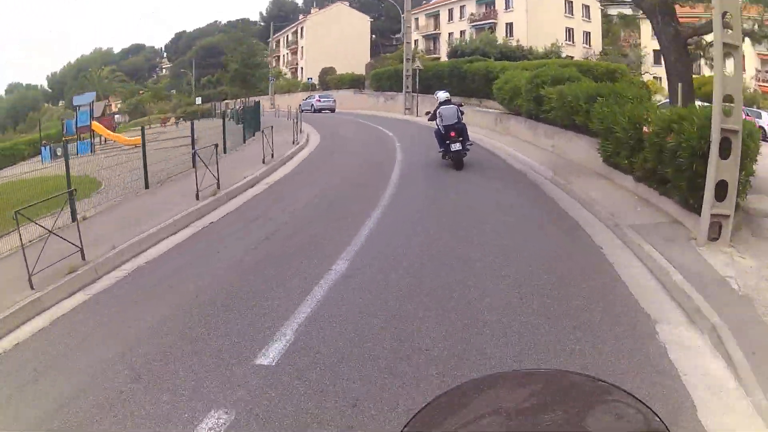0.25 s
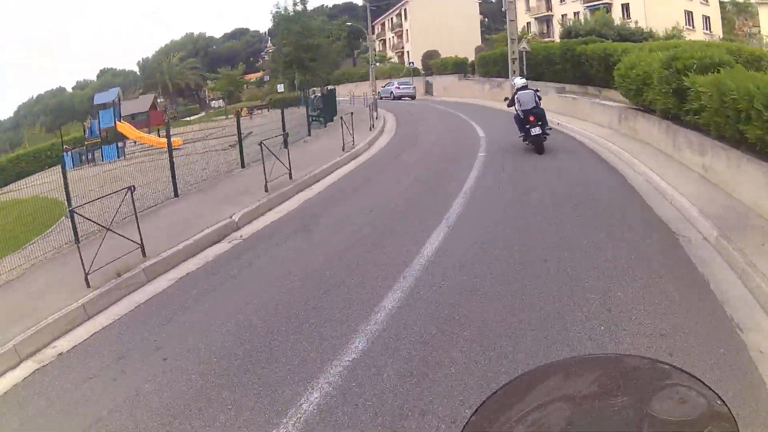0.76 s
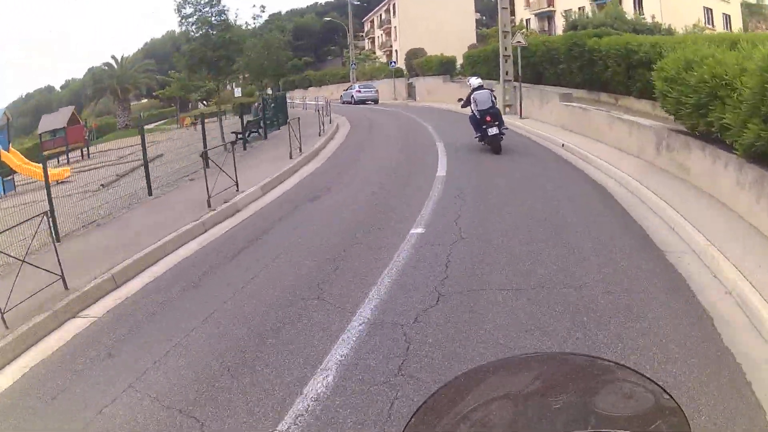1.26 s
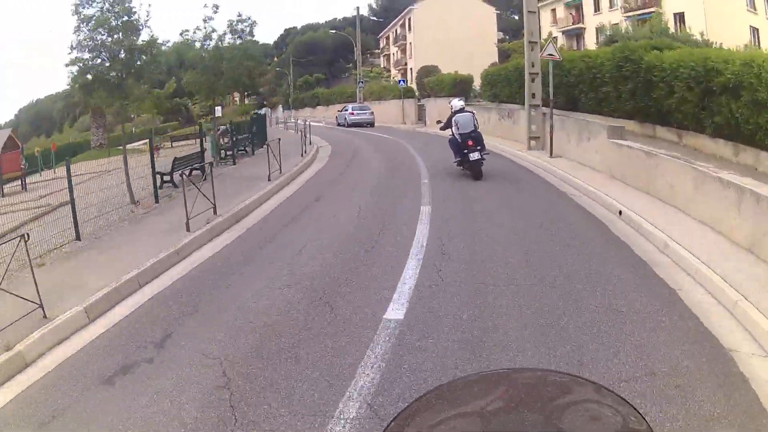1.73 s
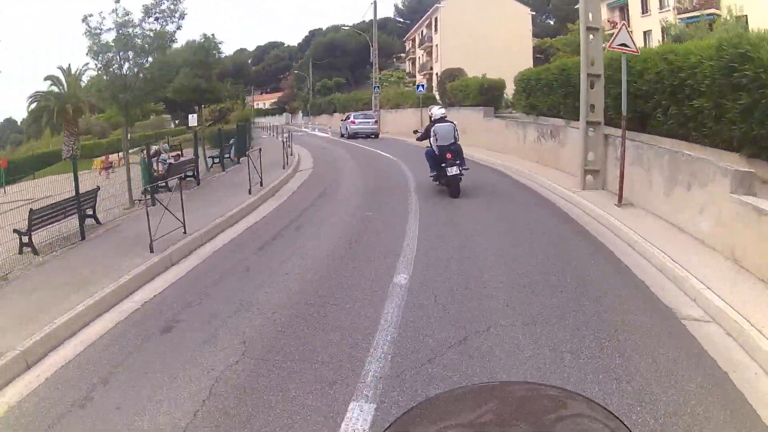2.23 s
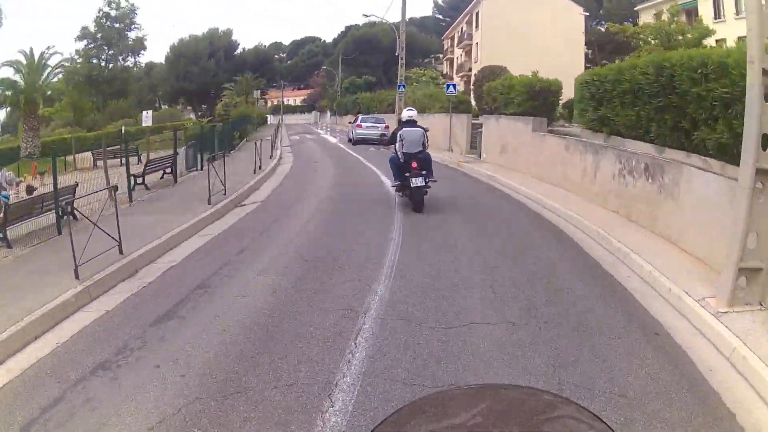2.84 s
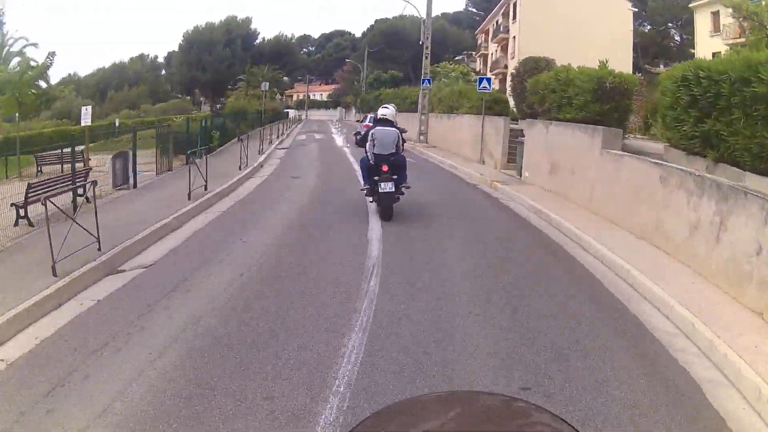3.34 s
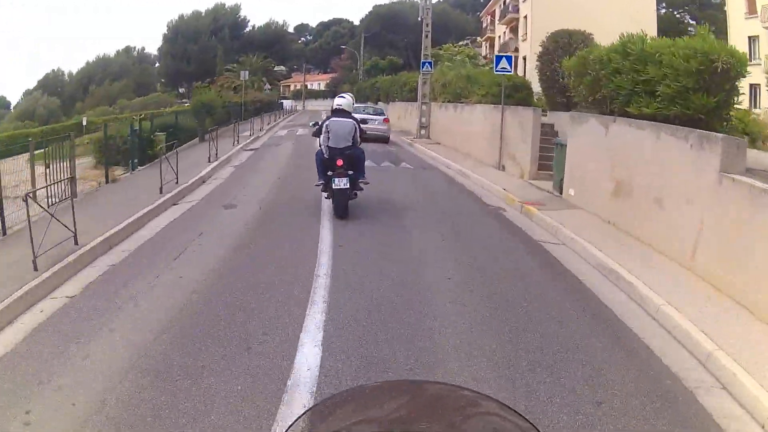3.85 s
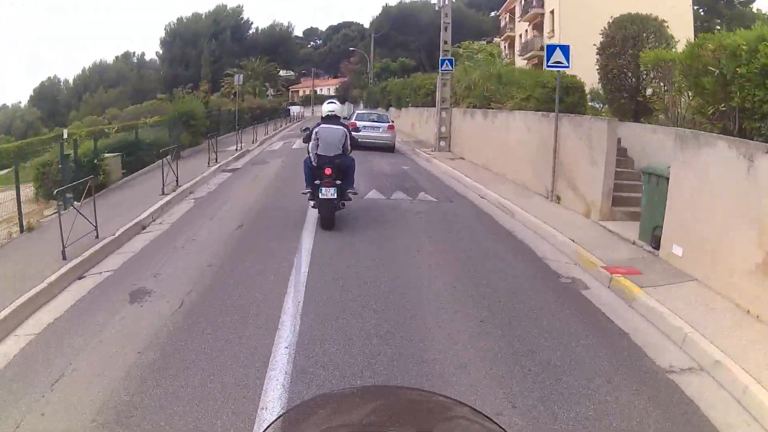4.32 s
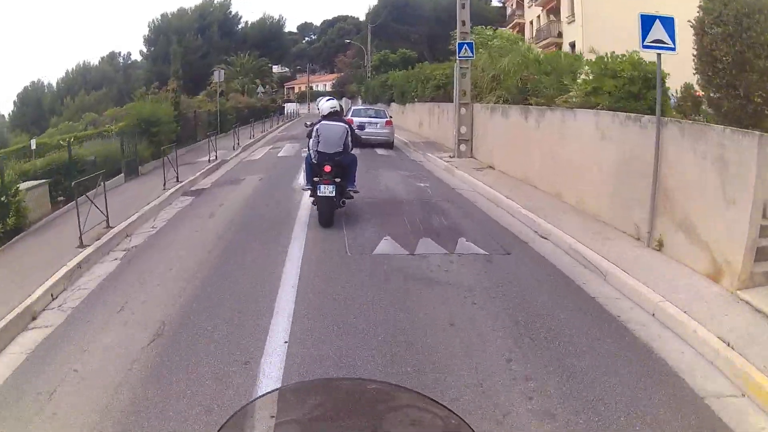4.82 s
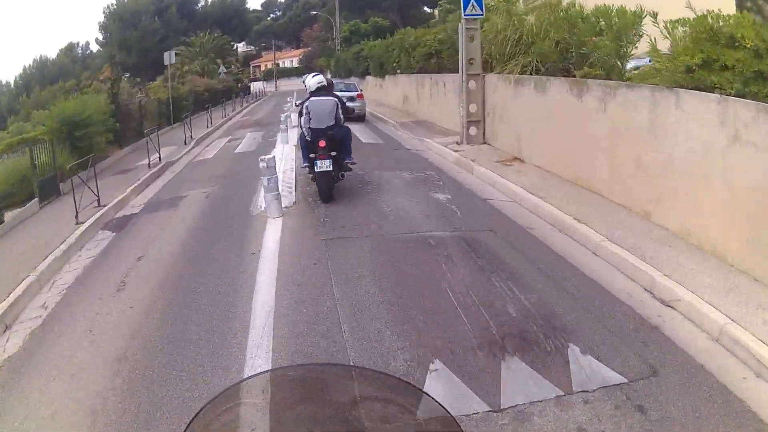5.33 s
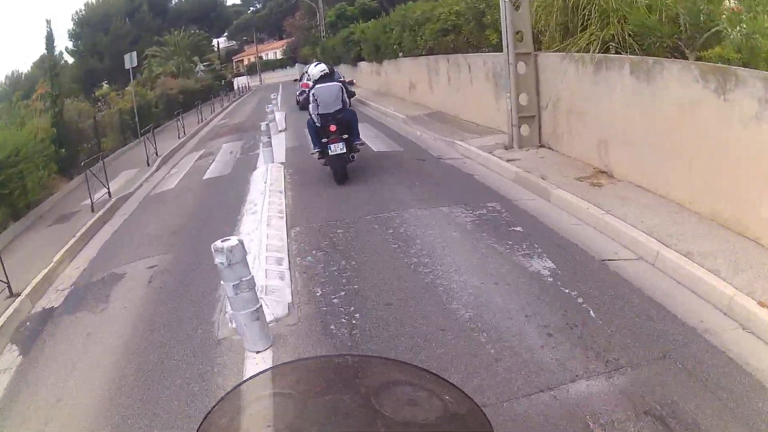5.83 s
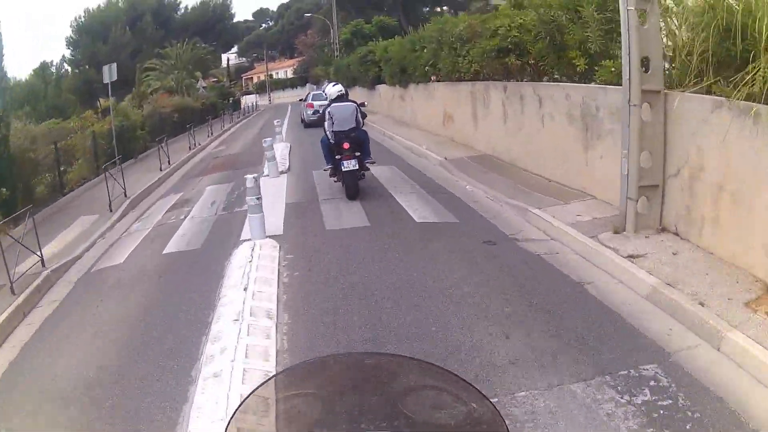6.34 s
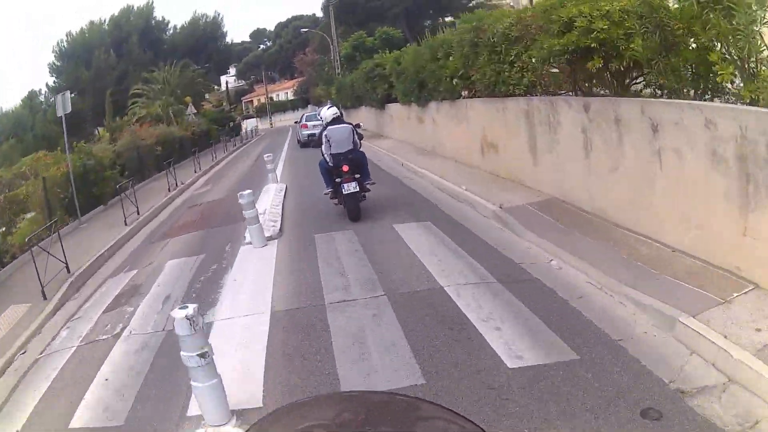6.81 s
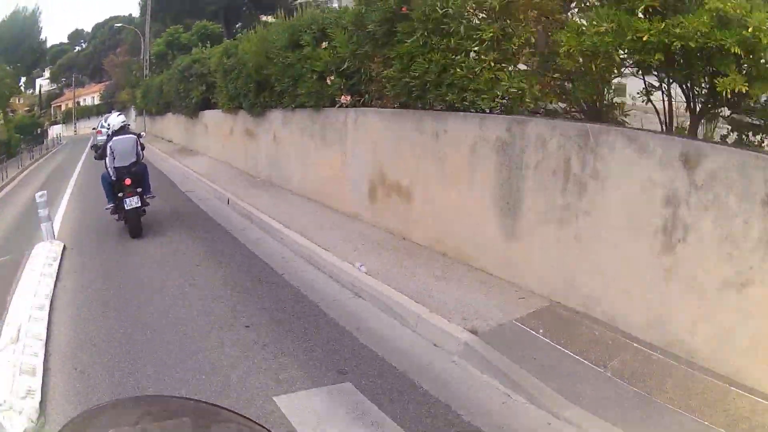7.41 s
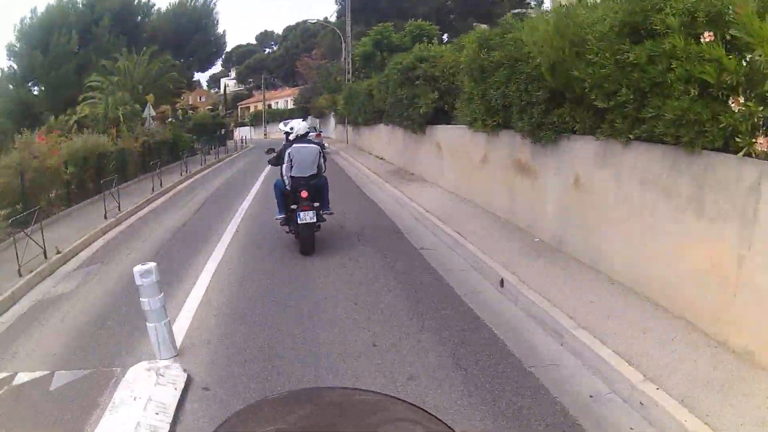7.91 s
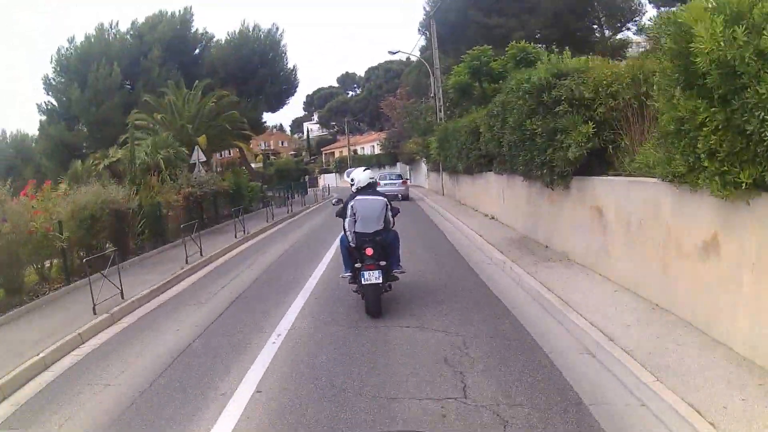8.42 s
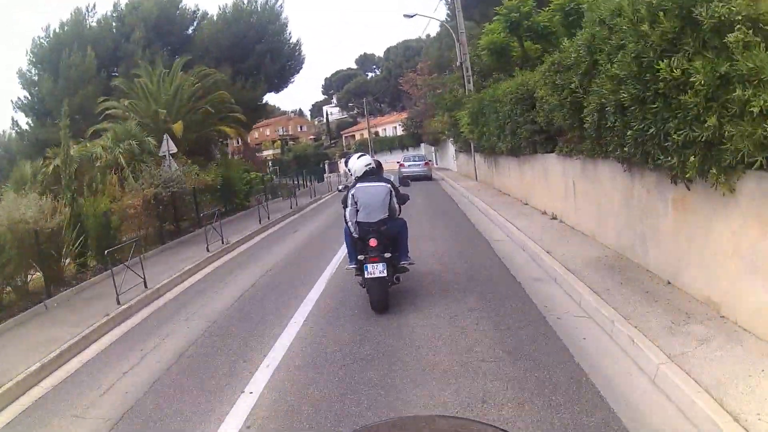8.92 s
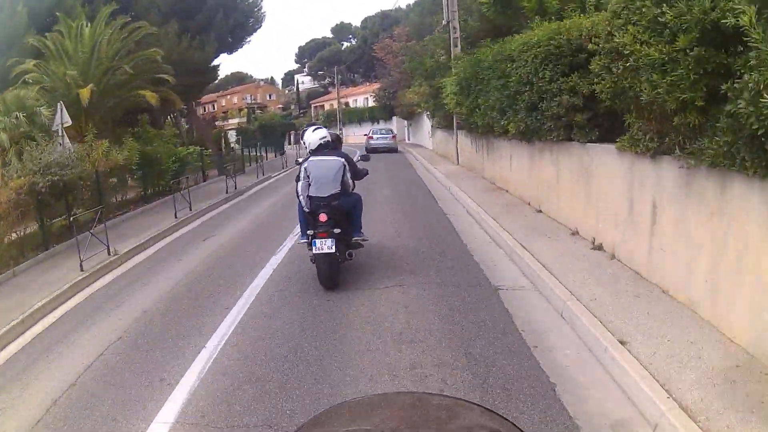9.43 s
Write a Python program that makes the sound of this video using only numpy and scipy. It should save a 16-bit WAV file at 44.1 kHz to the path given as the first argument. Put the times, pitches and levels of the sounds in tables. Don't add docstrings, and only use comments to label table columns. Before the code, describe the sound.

Heard from a small camera on a motorcyclist's helmet: a gritty engine pull rises briefly, then the throttle shuts and the bike coasts, leaving wind roar and heavy low buffeting. A second, deeper pull builds with rattling exhaust and valve clatter, then fades into the wind. A thin, high electronic whine and hiss persist throughout.

```python
import sys
import numpy as np
from scipy import signal
from scipy.fft import rfft, irfft, next_fast_len
from scipy.io import wavfile
from scipy.ndimage import uniform_filter1d, map_coordinates

SR = 44100
rng = np.random.default_rng(int(sys.argv[2]) if len(sys.argv) > 2 else 0)


def output_pcm(signal):
    pcm = np.clip(np.atleast_2d(signal).T, -1, 1) * 32767
    wavfile.write(sys.argv[1], SR, np.round(pcm).astype(np.int16))


def amplitude_ratio(level_db):
    exponent = np.asarray(level_db, float) / 20
    return 10 ** exponent


N = 426006

# time in seconds, exhaust level in dB.
LOAD = [(0, -37), (.4, -35.5), (.8, -34.5), (1.5, -35), (1.72, -38), (1.85, -46), (2.1, -65), (5.5, -65),
        (5.8, -48), (6.2, -41.5), (6.5, -40), (7.2, -39.5), (7.7, -38), (8.25, -38.5), (8.55, -43),
        (8.8, -52), (9.66, -56)]
# time in seconds, wind strength in dB.
AIRFLOW = [(0, -33.5), (.5, -32), (.8, -29.5), (1.5, -27), (1.9, -29), (2.5, -29.5), (2.75, -26.5),
           (3.2, -30.5), (3.75, -33), (4, -36), (4.6, -34.5), (5, -35.5), (5.7, -36.5), (7.2, -36),
           (7.9, -33.5), (8.45, -34), (9.3, -31.5), (9.66, -33.5)]
# centre in Hz, width in Hz, boost in dB.
HOUSING_MODES = [(1017, 127, 17), (1301.5, 91, 12.5), (1846, 444, 6.5), (2944, 140, 4.5), (4216, 452, 20),
                 (6230, 460, 10.5), (4255, 72, 4.5), (4720, 430, -3)]
# start in seconds, length in seconds, top in dB, swing in Hz.
SWINGS = [(0, 0.29, -26, 42.1), (0.285, 0.17, -25.5, 41.5), (0.474, 0.25, -16.5, 41.4),
          (.73, .27, -23, 40.7), (0.975, 0.44, -17.5, 40.7), (1.395, 0.51, -14, 40),
          (1.854, 0.23, -14, 41.8), (2.07, 0.14, -21, 44), (2.228, 0.33, -16, 43.48),
          (2.445, 0.67, -18, 43.05), (2.995, 0.43, -20.5, 41), (3.48, 0.27, -22.5, 41),
          (3.752, 0.25, -23, 41.2), (4.055, 0.18, -29, 43.2), (4.222, 0.33, -23.5, 40.6),
          (4.571, 0.82, -32, 40.63), (4.997, 0.49, -33, 45.16), (5.489, 0.42, -31, 40.9),
          (5.871, 0.24, -29.5, 41.2), (6.158, 0.33, -29.5, 41), (6.619, 0.26, -32, 39.7),
          (6.858, 0.25, -29, 42.6), (7.346, 0.27, -24.5, 42.4), (7.702, .24, -25.5, 42.16),
          (8.085, 0.36, -33.5, 40), (8.48, 0.27, -27, 41), (8.693, 0.23, -19.5, 39.6),
          (8.873, 0.27, -18.5, 39.2), (9.15, 0.14, -22, 40.3), (9.407, 0.24, -23.5, 38.43)]
REST_DB = -44


def engine():
    # time in seconds, engine cycles per second in Hz.
    pull_1 = [
        (0, 36),
        (.45, 36.98),
        (.85, 38.07),
        (1.25, 38.99),
        (1.45, 39.11),
        (1.85, 39.1),
    ]
    # time in seconds, engine cycles per second in Hz.
    coast = [
        (1.95, 37.5),
        (2.05, 38.47),
        (2.789, 37.16),
        (3.86, 29.0),
        (4.1, 25.52),
        (5.4, 23.62),
    ]
    # time in seconds, engine cycles per second in Hz.
    pull_2 = [
        (5.4, 24.3),
        (6.25, 23.92),
        (6.45, 24.22),
        (7.25, 26.85),
        (7.65, 28.1),
        (8.25, 29.66),
        (8.45, 29.94),
        (9.66, 30.2),
    ]
    front_fires = .0779, 6.1164
    # delay in cycles, level in dB.
    rear_cylinder = [
        (.56, -20),
        (.365, -2),
    ]
    edges_hz = 1150, 720
    pull_orders = [
        (-15, -32, -16, -20, -25),
        (-30, -25, -15, -13, -17),
    ]
    coast_orders = [
        (-55, -52, -61, -65, -68),
        (-64, -59, -59, -60, -68),
    ]
    load_db = curves(LOAD)[0]
    pressure, blows, cycle = np.zeros((3, N))
    orders = np.zeros((5, N))
    spells = zip([[*pull_1, *coast], pull_2], front_fires, rear_cylinder, edges_hz, pull_orders, coast_orders)
    for speed, fires, rear, edge_hz, pulled, coasting in spells:
        turns, on = crank(speed, fires)
        spell = on * firings(turns, rear, scatter_db=1.8)
        pressure += exhaust_blow(spell, edge_hz) * np.sqrt(np.mean(on))
        blows += on * firings(turns, (rear[0], -11), scatter_db=1.6)
        cycle += on * turns
        pulled_db = np.add.outer(pulled, load_db)
        orders += on * np.maximum(amplitude_ratio(coasting)[:, None], amplitude_ratio(pulled_db))
    return exhaust(pressure, load_db) + valves(blows, load_db) + drone(cycle, orders) + intake(load_db)


def exhaust_blow(spell, edge_hz):
    def shape(f):
        advance = np.exp(2j * np.pi * f * .0004)
        return 1j * f / (1 - 1j * f / 330) / (1 + 1j * f / edge_hz) ** 3 * advance
    return unit(filtered(spell, shape))


def exhaust(pressure, load_db):
    # delay in seconds, level in dB.
    echoes = [
        (.0023, -4.5),
        (.0047, -8.5),
    ]
    # centre in Hz, width in Hz, boost in dB.
    pipe = [(298.5, 17, 15), (476, 30, 4), (587, 30, 13), (670, 98, -4.5), (856, 130, 7)]
    pipe_tone = boosted(pipe)

    def path(f):
        bounces = sum(amplitude_ratio(db) * np.exp(-2j * np.pi * f * s) for s, db in echoes)
        return (1 + bounces) * pipe_tone(f)
    return amplitude_ratio(load_db) * unit(filtered(pressure, path))


def valves(blows, load_db):
    puffs = filtered(blows, lambda f: np.exp(2j * np.pi * f * .0015) / (1 + 1j * f / 150) ** 2)
    spectrum = [(1500, -20), (3000, -7.5), (4200, -6.0), (5000, -27), (7300, -13), (9000, -40), (14000, -120)]
    clatter = puffs * rush(spectrum, HOUSING_MODES, patchy_db=-1.8)
    ping_s, ping_half_s, ping_db = 6.55, .35, 5.5
    ping = np.clip(1 - abs(np.arange(N) / SR - ping_s) / ping_half_s, 0, 1)
    level_db = together(load_db - 14.5, -66.5) + ping_db * ping
    return amplitude_ratio(level_db) * unit(clatter)


def drone(cycle, orders):
    # centre in Hz, width in Hz, boost in dB.
    bike_frame = [(77, 14, 6), (119, 26, 10)]
    tones = np.zeros(N)
    for order, size in enumerate(orders, 2):
        tones += size * amplitude_ratio(1.16 * wobble(4)) * np.sin(2 * np.pi * order * cycle)
    return np.sqrt(2) * filtered(tones, boosted(bike_frame))


def intake(load_db):
    breath = filtered(rng.standard_normal(N), lambda f: ring(f, hz=1762, width=415) ** 2)
    return amplitude_ratio(together(load_db - 5.5, -47)) * unit(breath)


def crank(pull, fires):
    turns = np.cumsum(curves(pull)[0]) / SR
    t = np.arange(N) / SR
    return turns - turns[round(fires * SR)], (t >= pull[0][0]) * (t < pull[-1][0])


def firings(turns, rear, scatter_db):
    blows = np.zeros(N)
    for delay, db in [(0, 0), rear]:
        at = np.flatnonzero(np.diff(np.floor(turns - delay)))
        scatter = rng.standard_normal(N // 500)[:len(at)]
        blows[at] = amplitude_ratio(db + scatter_db * scatter)
    return blows


def shake():
    # time in seconds, lower mode in dB, upper mode in dB.
    knocks = [(.5, -40, -31), (.57, -27, -42), (.96, -42, -39), (1.05, -31, -41), (1.24, -41, -37),
              (1.4, -35, -43), (1.48, -39, -33.5), (2.15, -30, -29), (2.26, -32, -42), (2.39, -50, -27),
              (2.53, -29.5, -43), (2.66, -40, -29.5), (2.77, -30, -29), (3.06, -42, -32.5),
              (3.23, -31, -29), (3.79, -31.5, -40), (4.39, -36, -51), (6.38, -42, -46), (6.94, -52, -37.5),
              (9.58, -37, -47)]
    t, db, wind_db = np.arange(N) / SR, swing_db(), curves(AIRFLOW)[0]
    hz = curves([(s + length / 2, hz) for s, length, _, hz in SWINGS])[0]
    swing = np.sqrt(2) * amplitude_ratio(db) * np.sin(2 * np.pi * np.cumsum(hz + 1.32 * wobble(9)) / SR)
    lower_db = wind_db - 12 + 1.57 * wobble(8)
    upper_db = wind_db - 10 + 1.57 * wobble(8)
    for s, lower_top, upper_top in knocks:
        tent_db = np.minimum(175 * (t - s), 200 * (s - t))
        lower_db = np.maximum(lower_db, lower_top + tent_db)
        upper_db = np.maximum(upper_db, upper_top + tent_db)
    swing += amplitude_ratio(0.33 * db - 30.5) * knocked(hz=40, width=43)
    swing += amplitude_ratio(wind_db - 7) * knocked(hz=41.5, width=10)
    lower = amplitude_ratio(lower_db) * knocked(hz=151.9, width=23.4)
    upper = amplitude_ratio(upper_db + 1.0) * knocked(hz=196.3, width=25.4)
    return swing + lower + upper


def knocked(hz, width):
    return unit(filtered(rng.standard_normal(N), lambda f: ring(f, hz, width) ** 2))


def swing_db():
    t = np.arange(N) / SR
    power = amplitude_ratio(2 * REST_DB)
    for s, length, db, _ in SWINGS:
        u = np.clip((t - s) / length, 0, 1)
        swell = np.sin(np.pi * u ** 0.96) ** (2 * 0.78)
        power = power + amplitude_ratio(2 * db) * abs(swell)
    return 10 * np.log10(power)


def wind():
    # centre in Hz, width in Hz, boost in dB.
    mount = [(81, 18, 5), (121, 12, 2)]
    # frequency in Hz, density in dB per Hz.
    lows_spectrum = [(8, -8), (20, -1.5), (35, 12), (65, -4.5), (130, -4.5), (180, -21), (300, -8),
                     (380, -15.5), (700, -69), (3000, -120)]
    body_spectrum = [(150, -32), (240, -1.5), (320, -3), (550, -5.5), (700, -4), (900, -14), (2000, -36),
                     (5000, -120)]
    roar_spectrum = [(400, -15), (750, -4), (1100, -1), (2000, -7), (2600, -10), (5000, -56), (8000, -120)]
    fizz_spectrum = [(1500, -14.5), (2400, -5.5), (3400, -9), (4600, -15), (6800, -24), (8000, -22),
                     (10000, -36), (14000, -120)]
    roar_db, load_db = curves(AIRFLOW)[0], curves(LOAD)[0]
    buffet_db = roar_db - 5 + 0.13 * (swing_db() - REST_DB)
    body_db = together(roar_db - 9.5, load_db - 1.5)
    fizz_db = together(roar_db - 14.5, load_db - 11.5)
    flurries, eddies = wobble(7), wobble(30)
    lows = amplitude_ratio(buffet_db + 0.8 * wobble(7.7)) * rush(lows_spectrum, mount, patchy_db=-1.1)
    noise_share = np.clip(1 - amplitude_ratio(2 * (load_db - body_db) - 4), .25, 1)
    body_gain = np.sqrt(noise_share) * amplitude_ratio(body_db - 0.95 + 0.31 * eddies)
    body = body_gain * rush(body_spectrum, [], patchy_db=1.5)
    roar_gain = amplitude_ratio(roar_db + 0.12 + 0.5 * eddies + .55 * flurries)
    roar = roar_gain * rush(roar_spectrum, HOUSING_MODES, patchy_db=-0.44)
    fizz_gain = amplitude_ratio(fizz_db + 1.0 * eddies + 0.13 * flurries)
    fizz = fizz_gain * rush(fizz_spectrum, HOUSING_MODES, patchy_db=0.5)
    return lows + ducked() ** 0.68 * (body + roar + fizz)


def supply():
    # start in seconds, length in seconds.
    rests = [(.29, .03), (0.592, .02), (1.061, 0.0079), (1.528, .02), (2.129, 0.031), (2.459, 0.033),
             (2.768, 0.026), (3.068, 0.029), (3.469, 0.027), (3.87, 0.023), (4.235, 0.048), (4.601, 0.043),
             (5, 0.051), (5.437, 0.054), (5.74, 0.047), (6.075, 0.045), (6.5, 0.02), (6.787, 0.036),
             (7.137, 0.04), (7.499, 0.029), (7.712, .046), (8, 0.028), (8.315, 0.028), (8.613, 0.026),
             (8.949, 0.032), (9.215, .04), (9.52, 0.03)]
    steps_s = .65, 1.65, 2.6, 3.65, 4.68, 5.6, 6.65, 7.74, 8.6
    # frequency in Hz, density in dB per Hz.
    hiss_spectrum = [(5000, -20), (6500, -2), (7400, -10), (8300, 0), (10000, -2), (12500, -7.5),
                     (14150, -6.5), (14400, -13), (15000, -11), (15700, -10), (16000, -60)]
    t = np.arange(N) / SR
    frame = (t - .0262) * 29.918
    from_readout = (frame + .5) % 1 - .5
    load = frame_load(frame, from_readout)
    resting = sum((t > s) & (t < s + length) for s, length in rests)
    running = uniform_filter1d(1. - resting, size=90)
    jitter_hz = (310 + 190 * load) * wobble(1800) + 90 * wobble(150)
    idle_hz = 10990 + 125 * (-1) ** np.searchsorted(steps_s, t)
    hz = idle_hz * (1 - load) + 8700 * load + jitter_hz
    flutter_db = (1.5 + 1.5 * load) * wobble(900)
    whine = amplitude_ratio(-57.5 + 4.2 * load + flutter_db) * np.sin(2 * np.pi * np.cumsum(hz) / SR)
    crackle = rush([(9000, -40), (12500, -6), (14400, -2), (15300, -6)], [], patchy_db=1.5)
    spikes = amplitude_ratio(-69 + 3.5 * wobble(40)) * np.exp(-(from_readout / .05) ** 2) * crackle
    hiss = amplitude_ratio(-64.5) * rush(hiss_spectrum, [], patchy_db=-1.5)
    return ducked() * (running * (whine + spikes) + hiss)


def frame_load(frame, from_readout):
    number = np.floor(frame)
    load = (abs(from_readout) < .135) | np.isin(number, (21, 242))
    slips = np.searchsorted((20, 250), frame)
    load |= (number - slips) % 15 == 11
    return uniform_filter1d(load * 1., size=70)


def ducked():
    # start in seconds, length in seconds, gain in dB.
    ducks = [
        (1.711, 0.09, -7),
        (1.846, 0.043, -8),
        (1.938, 0.046, -6.5),
    ]
    t = np.arange(N) / SR
    dip_db = sum(db * (t > s) * (t < s + length) for s, length, db in ducks)
    return amplitude_ratio(uniform_filter1d(dip_db, size=300))


def rush(spectrum, modes, patchy_db):
    z = signal.stft(rng.standard_normal(N), nperseg=512)[2]
    field = uniform_filter1d(rng.standard_normal(z.shape), size=6, axis=0)
    field = uniform_filter1d(field, size=8, axis=1)
    noise = signal.istft(z * amplitude_ratio(patchy_db * unit(field)), nperseg=512)[1][:N]
    hz, db = np.transpose(spectrum)
    resonances = boosted(modes)
    return unit(filtered(noise, lambda f: amplitude_ratio(np.interp(np.log(f + 1), np.log(hz), db)) * resonances(f)))


def ring(f, hz, width):
    return 1j * f * width / (hz * hz - f * f + 1j * f * width)


def boosted(modes):
    return lambda f: np.prod([1 + (amplitude_ratio(db) - 1) * ring(f, hz, width) for hz, width, db in modes], axis=0)


def filtered(x, response):
    m = next_fast_len(N + SR // 2)
    return irfft(rfft(x, m) * response(np.fft.rfftfreq(m, 1 / SR)), m)[:N]


def wobble(rate):
    return map_coordinates(rng.standard_normal(int(N * rate / SR) + 4), [np.arange(N) * rate / SR])


def curves(rows):
    s, *cols = np.transpose(rows)
    return [np.interp(np.arange(N) / SR, s, c) for c in cols]


def together(*levels_db):
    return 10 * np.log10(sum(amplitude_ratio(db) ** 2 for db in levels_db))


def unit(x):
    return x / np.sqrt(np.mean(x ** 2) + 1e-20)


def scene():
    return (engine() + shake() + wind() + supply())[None]


def roll_off(x):
    return signal.sosfilt(signal.butter(12, 15620, fs=SR, output="sos"), x)


def record(dry):
    return roll_off(dry)


dry = scene()
out = record(dry)
output_pcm(out)
```